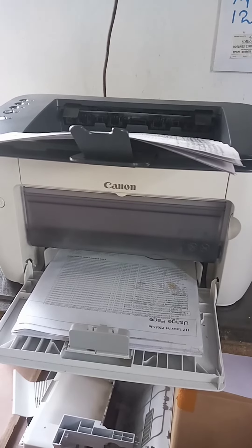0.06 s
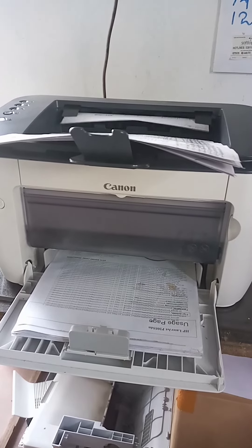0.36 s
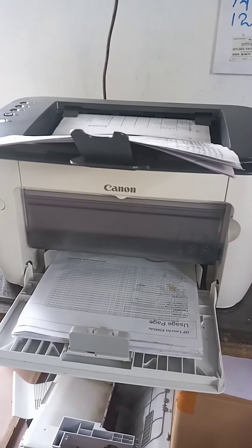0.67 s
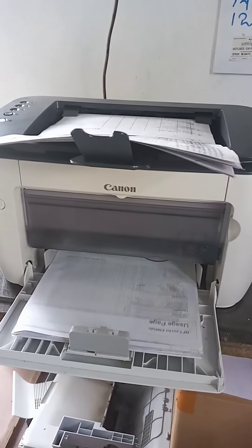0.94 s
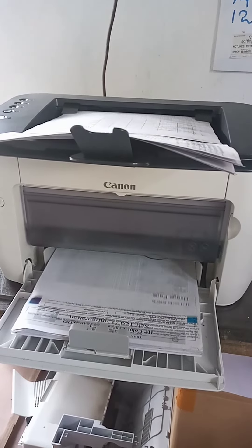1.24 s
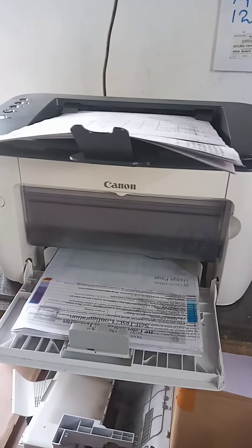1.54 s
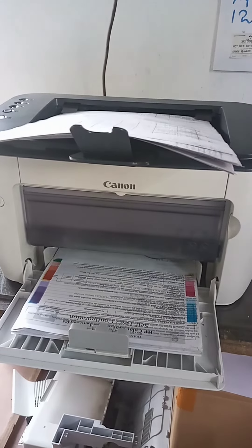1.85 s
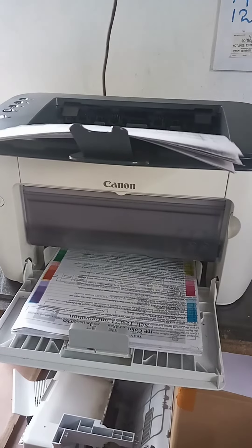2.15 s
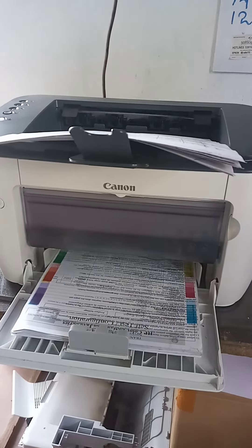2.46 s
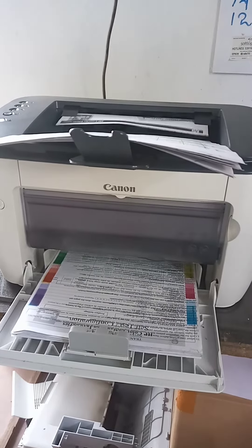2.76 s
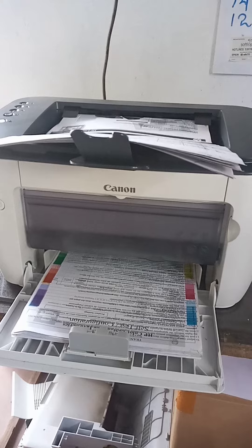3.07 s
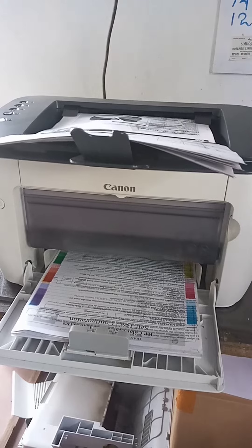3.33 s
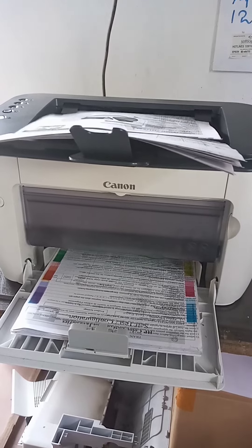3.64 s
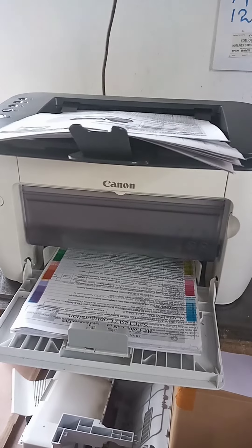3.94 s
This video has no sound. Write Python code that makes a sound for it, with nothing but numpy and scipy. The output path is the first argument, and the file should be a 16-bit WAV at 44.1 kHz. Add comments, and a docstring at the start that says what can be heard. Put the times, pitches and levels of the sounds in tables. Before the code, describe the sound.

A laser printer whirrs and rattles, clacking as it feeds sheets of paper.

```python
"""In a small room, a desktop laser printer delivers one sheet and feeds the next.
Its gears rattle and whine, the plastic housing drones, and paper hisses over the rollers in slow swells.
A clean whistle sounds during each page. The flexing paper bumps softly, and the clutch and pickup
lever clack as sheets are taken, setting plastic parts ringing. Two microphones hear it in stereo."""
import sys
import numpy as np
from scipy import signal
from scipy.fft import rfft, irfft
from scipy.io import wavfile

SR = 44100
rng = np.random.default_rng(int(sys.argv[2]) if len(sys.argv) > 2 else 0)


def master_out(mix):
    """Clip the mix to full scale and print it as 16-bit PCM to the path in sys.argv[1]."""
    frames = np.transpose(np.atleast_2d(mix))
    ceiling = np.clip(frames, -1, 1)
    pcm = np.round(ceiling * 32767).astype(np.int16)
    wavfile.write(sys.argv[1], SR, pcm)


N = 176400
T = np.arange(N) / SR
HZ = np.maximum(np.arange(N // 2 + 1) * SR / N, 1)

# How the running parts get louder and softer: time_s, rumble_db, housing_db, rollers_db, gears_db
RUNNING_LEVELS = [(0, -54, -46.5, -49.5, -35.5), (0.2, -56, -42.5, -47, -34.5),
                  (0.36, -56, -45.5, -46, -34.5), (0.56, -48.5, -41.5, -48, -34.5),
                  (0.7, -44.5, -45.5, -37, -32.5), (0.9, -50, -43, -38, -31.5),
                  (1.07, -44.5, -40.5, -38.5, -31), (1.15, -52, -48, -37.5, -32),
                  (1.25, -44.5, -37, -38.5, -31.5), (1.38, -49, -46, -44, -32.5),
                  (1.53, -52, -40, -44.5, -32.5), (1.63, -43, -46, -41.5, -31.5),
                  (1.72, -50, -43.5, -42.5, -35), (1.9, -49.5, -54, -46, -32.5),
                  (2.1, -51.5, -41.5, -43.5, -34.5), (2.22, -44, -54, -43, -31.5),
                  (2.32, -43, -40, -43.5, -32.5), (2.74, -49, -45, -43.5, -32.5),
                  (3.03, -45.5, -43.5, -48, -33), (3.24, -55, -45.5, -49, -36.5),
                  (3.45, -53, -52.5, -52, -35.5), (3.72, -53, -42, -49.5, -36),
                  (3.86, -70, -48, -54, -35.5), (4, -67, -43, -52, -35)]
# How much later each source reaches the left microphone
FRAME_LAG_S, GEAR_LAG_S, PAPER_LAG_S = 0.0011, 0.001065, 0.00125
ROOM_FADE_S = 0.23  # the echo falls by 60 dB in this time


def from_db(db):
    """Turn decibels into a number to multiply by."""
    return 10 ** (np.asarray(db) / 20)


def rms_one(x):
    """Scale a signal so that its average strength (rms) is 1."""
    return x / np.sqrt(np.mean(x ** 2) + 1e-20)


def in_time(rows):
    """Join a table's points in time, giving one curve for each value column."""
    times, *columns = np.transpose(rows)
    return [np.interp(T, times, column) for column in columns]


def at_hz(points):
    """Join a table's points in pitch, giving a value at every frequency."""
    hz, value = np.transpose(points)
    return np.interp(np.log(HZ), np.log(hz), value)


def drift(rate_hz, size=4096):
    """A smooth random wander, about 1 in size; a higher rate wanders faster."""
    hz = np.arange(size // 2 + 1) * SR / N
    slow = rms_one(irfft(rfft(rng.standard_normal(size)) / (1 + (hz / rate_hz) ** 2)))
    return np.interp(np.arange(N) * size / N, np.arange(size), slow)


def pan(left_db):
    """Share a sound between left and right, keeping its total power."""
    half_db = np.atleast_1d(left_db) / 2
    gains = from_db([half_db, -half_db])
    return gains / np.sqrt(np.mean(gains ** 2, axis=0))


def at_microphones(direct, echoes, lag_s):
    """The spectrum at each microphone: direct sound reaches the left one later."""
    # How much louder the left microphone is: pitch_hz, left_db
    balance = [(60, 6), (170, 3.5), (350, 8.5), (470, 13), (620, -2.5), (800, 4), (1050, 2.5), (1400, 15),
               (2500, 15), (3500, 9), (4500, 7), (5600, 2.5), (6500, 4), (8600, 1.5), (9600, -10.5),
               (11000, -15.5), (13000, -18), (15000, -7.5)]
    # How the microphones' openings colour the treble: pitch_hz, gain_db
    openings = [(6500, 0.5), (7500, -2), (8200, -10), (8800, -6), (9500, -7.5), (10600, 1), (11400, 0.5),
                (12400, -2.5), (13700, -8.5), (14800, 4), (15800, 0)]
    delayed = np.array([direct * np.exp(-2j * np.pi * HZ * lag_s), direct])
    return (delayed + echoes) * pan(at_hz(balance)) * from_db(at_hz(openings))


def radiate(force, colour, lag_s):
    """A steady force shakes a body, heard directly and as scattered echoes; the result has rms 1."""
    # How alike the two microphones sound: pitch_hz, likeness (0 to 1)
    likeness = [(60, 0.86), (300, 0.87), (600, 0.67), (1200, 0.4), (2200, 0.52), (4500, 0.15), (14000, 0)]
    alike = at_hz(likeness)
    scatter = rfft(rng.standard_normal((2, N)) * np.exp(-T / 0.02))
    scatter /= np.sqrt(np.mean(abs(scatter) ** 2))
    direct = rfft(force)
    echoes = (direct * scatter + 2 * rfft(rng.standard_normal((2, N)))) / np.sqrt(5)
    heard = at_microphones(np.sqrt(alike) * direct, np.sqrt(1 - alike) * echoes, lag_s)
    return rms_one(irfft(heard * from_db(at_hz(colour)), N))


def room_echo(build_up=1):
    """The spectrum of the small room's echo: many reflections blur into fading noise."""
    tail = rng.standard_normal((2, N)) * from_db(-60 * T / ROOM_FADE_S) * build_up
    return rfft(tail / np.sqrt(np.sum(tail ** 2) / 2))


def contacts(per_s, spread_db, tick_share):
    """Tiny random hits of uneven size over smooth rubbing noise."""
    sizes = from_db(spread_db * np.minimum(rng.exponential(1, N), 5)) * rng.choice([-1, 1], N)
    ticks = rms_one(sizes * (rng.random(N) < per_s / SR))
    return np.sqrt(tick_share) * ticks + np.sqrt(1 - tick_share) * rng.standard_normal(N)


def tone(hz, db, left_db):
    """A pure tone at both microphones; db is its rms level."""
    cycles = np.cumsum(hz + np.zeros(N)) / SR - hz * np.array([[GEAR_LAG_S], [0]])
    return np.sqrt(2) * from_db(db) * np.sin(2 * np.pi * cycles) * pan(left_db)


def roller_friction(bands=9, surge_db=3.2):
    """Rolling rubber makes noise whose narrow bands each surge and sink on their own."""
    edges_hz = np.geomspace(360, 1600, bands + 1)
    out = np.zeros(N)
    for band in zip(edges_hz, edges_hz[1:]):
        band_pass = signal.butter(2, band, "band", fs=SR, output="sos")
        out += from_db(surge_db * drift(12)) * signal.sosfilt(band_pass, rng.standard_normal(N))
    return out


def running_parts():
    """The frame rumbles, the housing shudders, the rollers rub and the gear teeth chatter."""
    # Which pitches each part gives off most strongly: pitch_hz, gain_db
    frame_colour = [(25, -31), (45, -39), (60, 2), (85, -0.5), (110, -4.5), (140, 4), (175, -0.5),
                    (230, -27), (330, -52)]
    housing_colour = [(130, -36), (210, -8), (250, -6), (300, 0.5), (345, 0.5), (385, -9), (430, -16.5),
                      (520, -27), (700, -74)]
    roller_colour = [(330, -21), (480, -7.5), (560, -2), (610, -3.5), (680, -4.5), (780, -3), (850, -2.5),
                     (930, 2.5), (1020, 0), (1120, -3), (1300, -6.5), (1700, -30)]
    gear_colour = [(900, -59), (1270, -8), (1480, 1), (1800, -0.5), (2100, 3), (2300, 1.5), (2550, -1),
                   (2850, -3), (3300, -2.5), (3700, -6.5), (4600, -7.5), (6400, -15), (8200, -76),
                   (16000, -63)]
    rumble_db, housing_db, rollers_db, gears_db = in_time(RUNNING_LEVELS)
    teeth = contacts(per_s=900, spread_db=2, tick_share=0.29)
    rumble = from_db(rumble_db - 3.5) * radiate(rng.standard_normal(N), frame_colour, FRAME_LAG_S)
    shudder_db = drift(5.9)
    drone = radiate(rng.standard_normal(N), housing_colour, FRAME_LAG_S)
    drone *= from_db(housing_db + 1.7 + shudder_db)
    rollers = from_db(rollers_db - 0.68) * radiate(roller_friction(), roller_colour, FRAME_LAG_S)
    chatter_db = drift(97)
    rattle = from_db(gears_db - 1.37 + chatter_db) * radiate(teeth, gear_colour, GEAR_LAG_S)
    return rumble + drone + rollers + rattle


def motor_tones(flutter_db=3.2):
    """Faint, wavering tones, a mains hum at the two lowest pitches and motor and gear tones above, grow a
    little louder as the rollers take up load."""
    # The faint tones: pitch_hz, level_db, left_db
    tones = [(68.5, -69.5, 0), (141.3, -76, 10), (283.5, -58, 19), (379, -58, 26), (605, -59.5, -13.5),
             (912, -59.5, 23), (974, -58, 30), (1035, -55.5, 10), (1460, -52.5, 30), (1823, -53.5, 28),
             (1905, -54, 20), (2076, -57, -1), (2750, -54, 10), (3500, -60, 22), (3684, -53.5, 19),
             (3756, -56.5, 18), (15800, -74, -11)]
    rollers_db = in_time(RUNNING_LEVELS)[2]
    load_db = 0.19 * (rollers_db - rollers_db.mean())
    out = np.zeros((2, N))
    for hz, db, left_db in tones:
        wavering_hz = hz * (1 + 0.00209 * drift(15.4))
        out += tone(wavering_hz, db + load_db + flutter_db * drift(6.1), left_db)
    return out


def gear_whine(flutter_db=2):
    """Gear teeth meet in quick succession and make a wavering whine."""
    # How fast the teeth meet: time_s, pitch_hz
    pitches = [(0, 2067), (.45, 2060), (.8, 2072), (1.3, 2076), (1.75, 2070), (2.25, 2074), (2.5, 2069),
               (3.25, 2072), (3.5, 2065), (4, 2062)]
    # The whine is stronger under the load of a sheet: time_s, level_db
    levels = [(0, -37), (.5, -40.5), (.8, -42), (1.15, -49), (1.35, -37), (2.2, -37), (2.8, -38),
              (3.2, -36.5), (3.5, -40), (4, -39)]
    hz, = in_time(pitches)
    db, = in_time(levels)
    wavering_hz = hz * (1 + 0.00216 * drift(8.54))
    return tone(wavering_hz, db + flutter_db * drift(35), left_db=16)


def page_whistle(pitch_hz=2604.5, swell_db=7, swell_s=0.076, fade_s=0.08):
    """The drive whistles at one pitch during each page, starting softly and building up."""
    # When the drive whistles: start_s, end_s, level_db
    pages = [(-.2, 0.844, -41), (1.06, 3.157, -36)]
    loudness = np.zeros(N)
    for start, end, db in pages:
        softer_db = swell_db * np.exp(-np.maximum(T - start, 0) / swell_s)
        fade = np.clip(np.minimum(T - start, end - T) / fade_s + 0.5, 0, 1)
        loudness += from_db(db - softer_db) * fade
    flutter_db = drift(47)
    return loudness * tone(pitch_hz, flutter_db, left_db=16)


def paper_hiss():
    """Fibres slide over guides and rollers; more pressure makes the hiss brighter and further left."""
    # How the hiss swells (only the swing around the average counts): time_s, level_db
    swells = [(0, -40.5), (0.15, -40), (0.36, -41.5), (0.43, -44), (0.55, -44.5), (0.72, -39), (0.9, -38),
              (1.05, -36.5), (1.13, -40), (1.22, -36.5), (1.32, -40.5), (1.42, -37.5), (1.65, -34),
              (1.8, -35.5), (1.93, -41), (2.07, -37.5), (2.25, -37), (2.45, -40), (2.6, -35), (2.8, -34.5),
              (2.94, -42.5), (3.08, -37.5), (3.2, -38), (3.35, -39.5), (3.6, -37.5), (3.73, -45),
              (3.92, -34.5), (4, -35.5)]
    # The colours of the rustle and of the finest hiss: pitch_hz, gain_db
    rustle_colour = [(1500, -33), (3000, -5), (4500, -2.5), (5500, -0.5), (6400, 3.5), (7500, -2),
                     (9000, -13), (12000, -24)]
    sizzle_colour = [(4000, -29), (7000, -14), (9000, 2.5), (11000, 1), (15700, -3.5)]
    swell_db, = in_time(swells)
    swell_db -= swell_db.mean()
    fibres = contacts(per_s=5000, spread_db=7, tick_share=0.6)
    rustle = from_db(-42.5 + swell_db) * radiate(fibres, rustle_colour, PAPER_LAG_S)
    sizzle_db = -42 + np.outer((2.1, 1.35), swell_db)  # swings further on the left
    sizzle = from_db(sizzle_db) * radiate(rng.standard_normal(N), sizzle_colour, PAPER_LAG_S)
    return rustle + sizzle


def paper_bumps():
    """Soft bumps of sheet and housing swell and fade at one unsteady pitch each, roughened by rubbing."""
    # The dull bumps: start_s, pitch_hz, level_db
    bumps = [(0.054, 391, -35), (.175, 231, -38), (0.524, 253, -33), (0.743, 288, -26), (.825, 800, -30),
             (.872, 389.4, -28.5), (1.262, 589, -25), (1.284, 606, -32), (1.43, 270.7, -26.5),
             (1.78, 364.5, -31.5), (1.946, 591, -34), (2.13, 894, -28.5), (2.151, 322, -27.5),
             (2.245, 760, -36.5), (2.554, 371, -32.5), (2.687, 171.4, -37), (2.818, 242, -30.5),
             (3.157, 269.6, -33), (3.291, 288, -38), (3.425, 619, -45), (3.44, 150, -43), (3.645, 715, -45),
             (3.787, 242, -36.5)]
    wavering_time = np.cumsum(1 + 0.06 * drift(70)) / SR
    out = np.zeros(N)
    for start, hz, db in bumps:
        rise_s = 0.0084 * np.sqrt(300 / hz)  # higher bumps are shorter
        age = np.maximum(T - start, 0) / rise_s
        out += from_db(db) * age * np.exp(1 - age) * np.sin(2 * np.pi * hz * wavering_time)
    roughness = rms_one(1 + 0.7 * drift(170))
    bass_cut = signal.butter(4, 138, "high", fs=SR, output="sos")
    direct = rfft(signal.sosfilt(bass_cut, out * roughness))
    echoes = from_db(-7.5) * direct * room_echo()
    return irfft(at_microphones(direct, echoes, FRAME_LAG_S), N)


def struck_part(times, levels_db, centres_hz, width_octaves, fade_s, size=8192):
    """Each hit makes a plastic part ring at many close pitches around a centre pitch."""
    hz = np.maximum(np.arange(size // 2 + 1) * SR / size, 1)
    out = np.zeros(N + SR)
    for start_s, db, centre in zip(times, levels_db, centres_hz):
        colour = np.exp(-(np.log2(hz / centre) / width_octaves) ** 2 / 2)
        ring = irfft(rfft(rng.standard_normal(size)) * colour) * from_db(-60 * T[:size] / fade_s)
        start = int(start_s * SR)
        out[start:start + size] += from_db(db) * ring / np.std(ring[:SR // 90])  # level of first 11 ms
    bass_cut = signal.butter(2, np.mean(centres_hz) / 2, "high", fs=SR, output="sos")
    return signal.sosfilt(bass_cut, out[:N])


def feed_knocks():
    """Clutch, lever and sheet edge knock; each knock rings four parts, and the room answers."""
    # The knocks: start_s, thud_db, body_db, clack_db, snap_db, clack_pitch, snap_pitch
    # (the pitches are relative: they are scaled so that their average is the part's centre_hz)
    knocks = [(.599, -45, -36, -18.5, -33, 2100, 3180), (0.615, -44, -32, -21.5, -47, 1900, 4200),
              (.628, -49, -31, -34, -50, 1400, 4000), (.637, -36, -30, -20.5, -44, 1880, 4000),
              (.658, -48, -36, -29, -52, 1890, 5000), (0.737, -39, -29.5, -19, -33, 2150, 4460),
              (.747, -35, -32, -22, -30, 2500, 6260), (0.76, -35, -41, -20.5, -49, 1490, 4500),
              (.804, -38.5, -49, -21, -29.5, 2270, 8200), (.829, -45, -41, -27, -31.5, 2280, 4900),
              (0.921, -55, -31.5, -31, -41, 1770, 5300), (.999, -52, -35, -23.5, -43, 2530, 4500),
              (1.07, -34, -37, -24.5, -37, 2190, 5300), (1.087, -41, -48, -27, -41, 1600, 5300),
              (1.23, -36, -46, -29, -41, 1900, 5300), (1.268, -36.5, -34, -33, -46, 1800, 5300),
              (1.353, -46, -51, -32, -46, 2290, 5300), (2.157, -56, -32.5, -27.5, -37, 1800, 4500),
              (2.288, -37, -48, -32, -37, 2000, 5000), (2.822, -35, -22.5, -19.5, -25, 2390, 4100),
              (2.839, -53, -35, -21.5, -51, 1410, 4300), (2.859, -33, -32, -32, -52, 1500, 4300),
              (2.882, -45, -25.5, -27, -40, 2020, 4320), (2.896, -38, -35, -28, -45, 1640, 4000),
              (3.106, -42, -41, -25, -29.5, 2420, 8400), (3.12, -35, -46, -28.5, -34, 2130, 5300),
              (3.296, -40, -62, -25, -48, 2380, 3600), (3.926, -52, -59, -32, -42, 3420, 4000)]
    # The parts behind thud, body, clack and snap: centre_hz, width_octaves, fade_s, direct_db, room_db
    parts = [(275, 0.26, 0.088, -4.5, -2.5), (750, 0.38, 0.054, -4, -5), (1903, 0.43, 0.037, -4, -4),
             (4800, 0.59, 0.058, -2.5, -4.5)]
    times, *levels, clack_pitch, snap_pitch = np.transpose(knocks)
    same_pitch = np.ones(len(times))
    pitches = [same_pitch, same_pitch, clack_pitch, snap_pitch]
    echo_build_up = 1 - np.exp(-T / 0.0012)
    direct, echoes = 0, 0
    for levels_db, pitch, part in zip(levels, pitches, parts):
        centre_hz, width_octaves, fade_s, direct_db, room_db = part
        centres_hz = centre_hz * pitch / pitch.mean()
        ring = rfft(struck_part(times, levels_db, centres_hz, width_octaves, fade_s))
        direct += from_db(direct_db) * ring
        echoes += from_db(room_db) * ring * room_echo(echo_build_up)
    return irfft(at_microphones(direct, echoes, GEAR_LAG_S), N)


def scene():
    """All the sounds of the printer, added together."""
    running = running_parts() + paper_hiss() + gear_whine() + page_whistle() + motor_tones()
    return running + feed_knocks() + paper_bumps()


def record(dry):
    """Round off the loudest peaks and steeply cut the highest treble."""
    peak_limit, cutoff_hz = 0.5, 15850
    rounded = peak_limit * np.tanh(dry / peak_limit)
    return signal.sosfilt(signal.ellip(12, 0.1, 80, cutoff_hz, fs=SR, output="sos"), rounded)


dry = scene()
out = record(dry)
master_out(out)
```